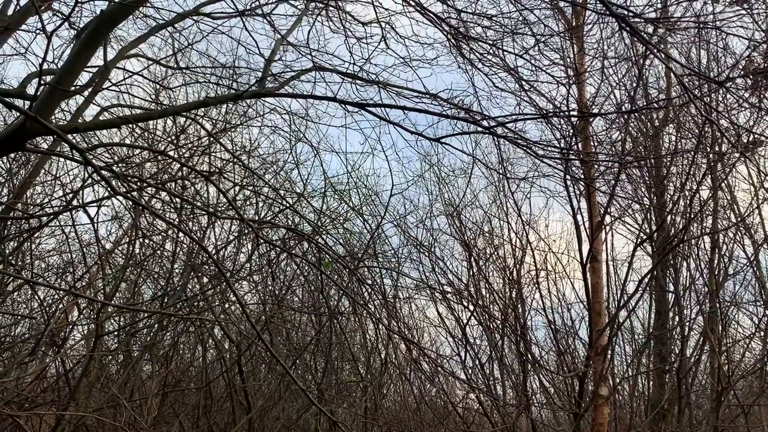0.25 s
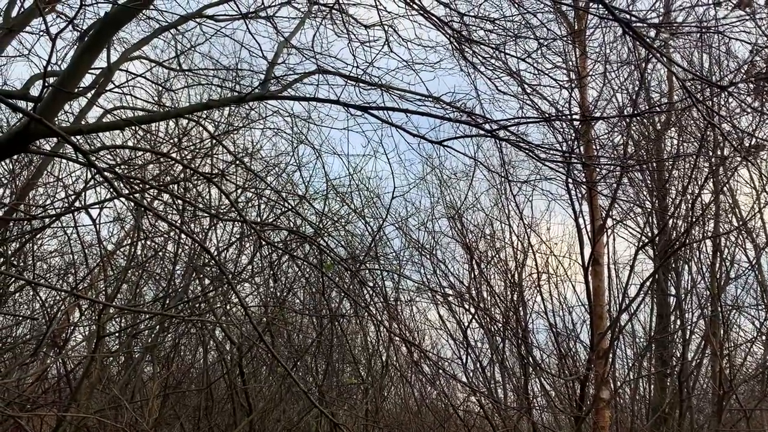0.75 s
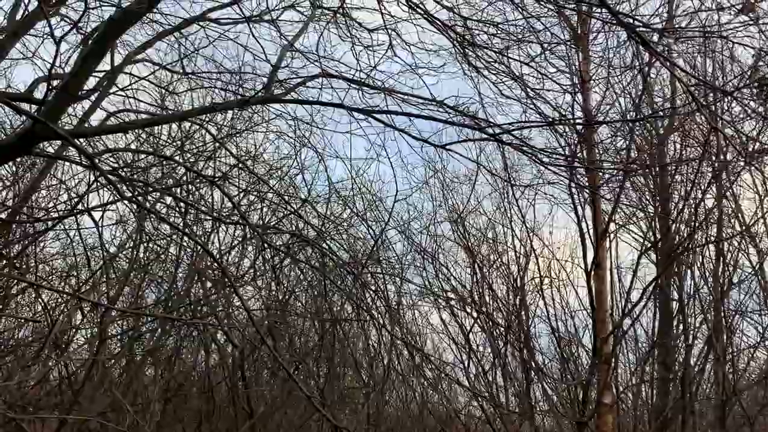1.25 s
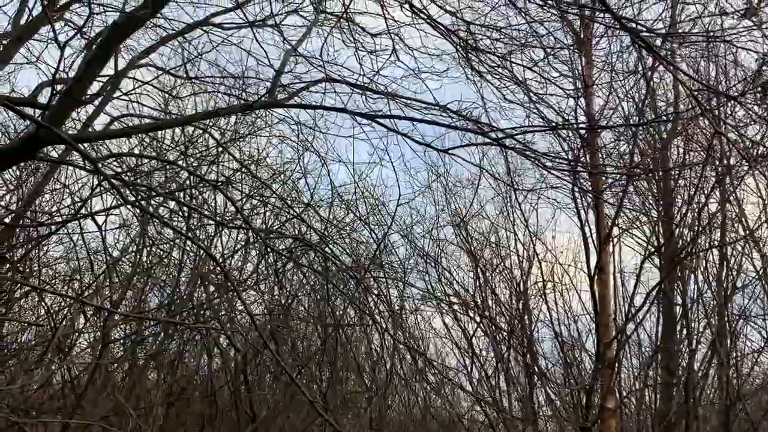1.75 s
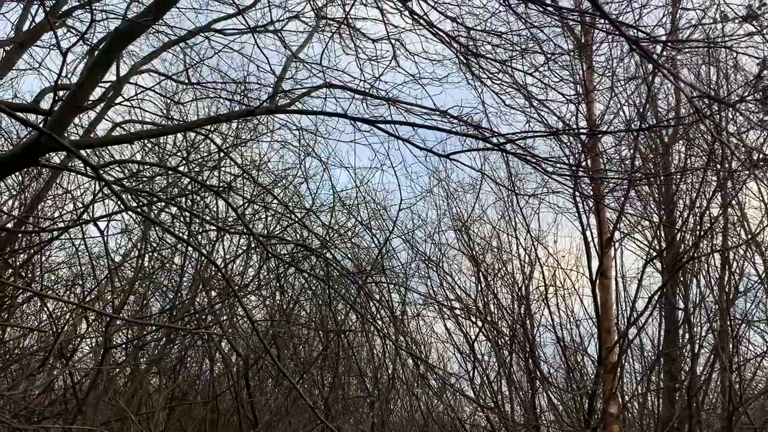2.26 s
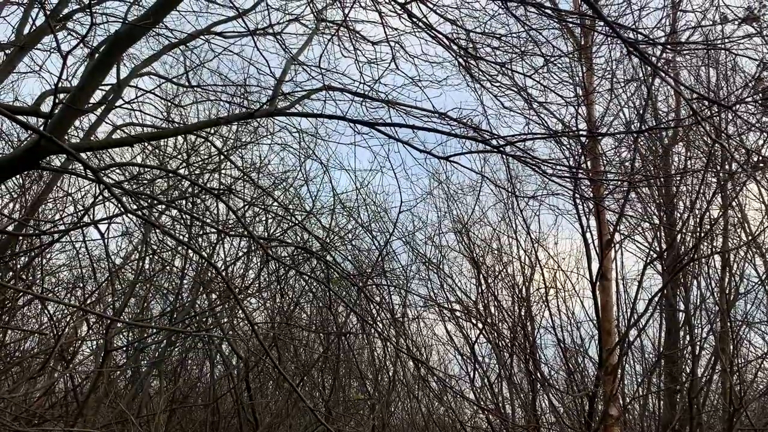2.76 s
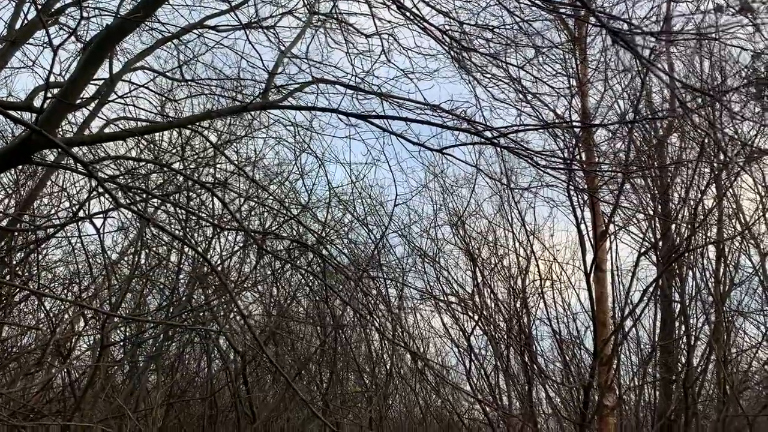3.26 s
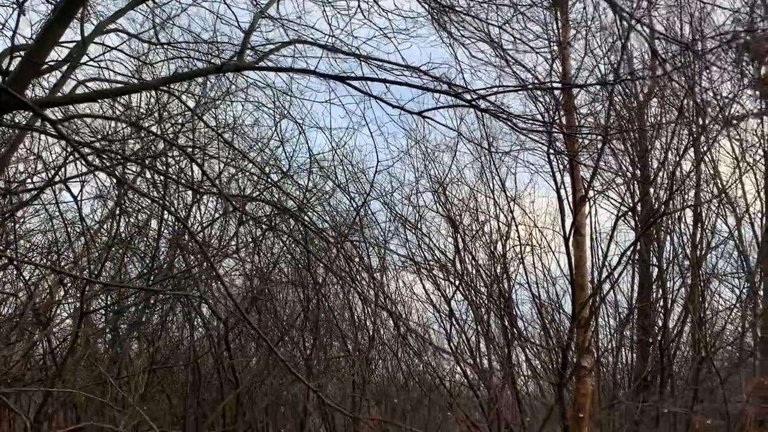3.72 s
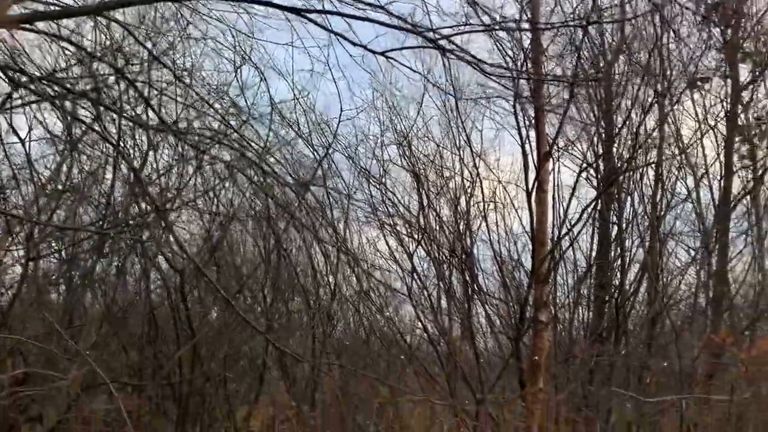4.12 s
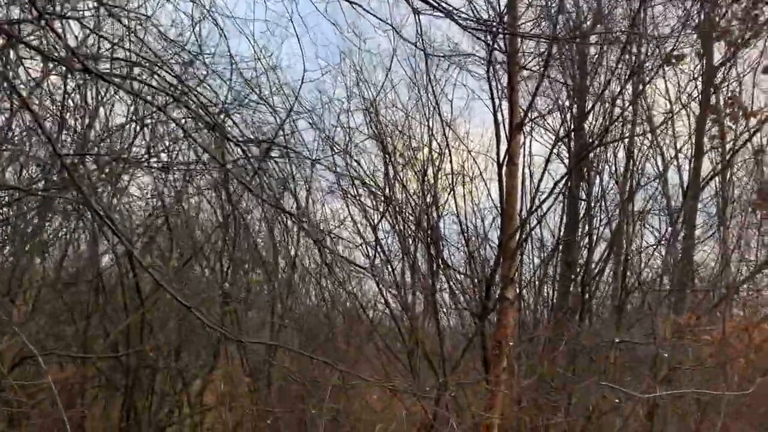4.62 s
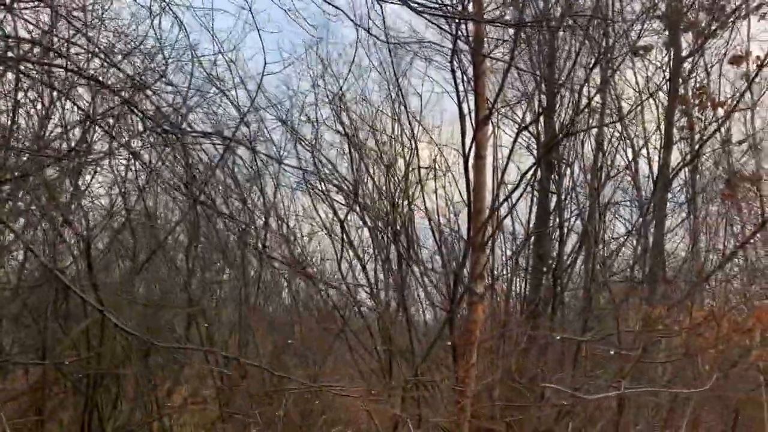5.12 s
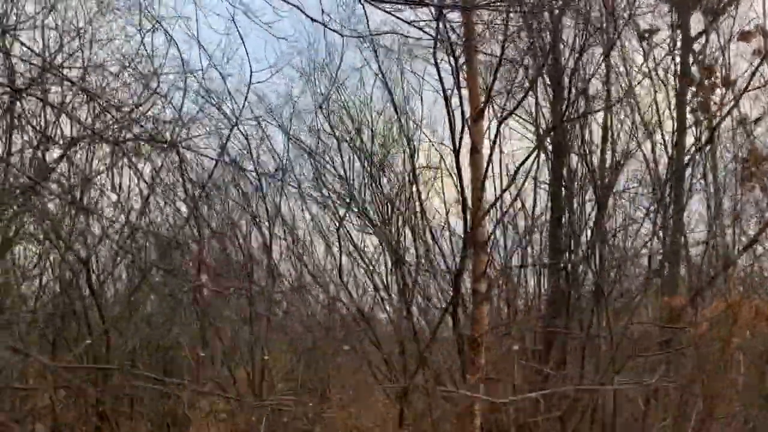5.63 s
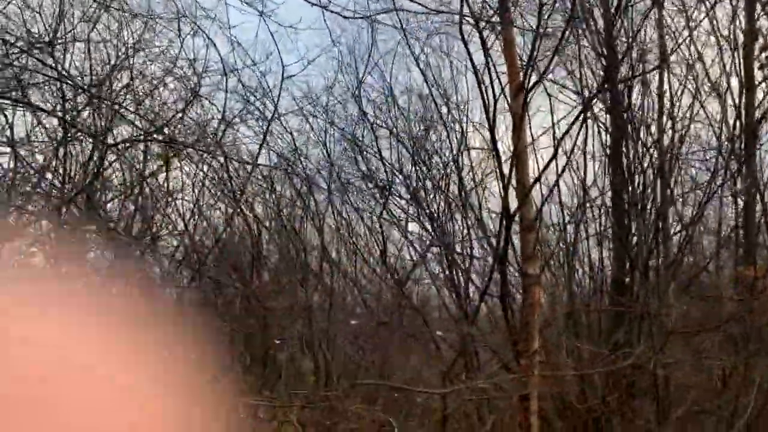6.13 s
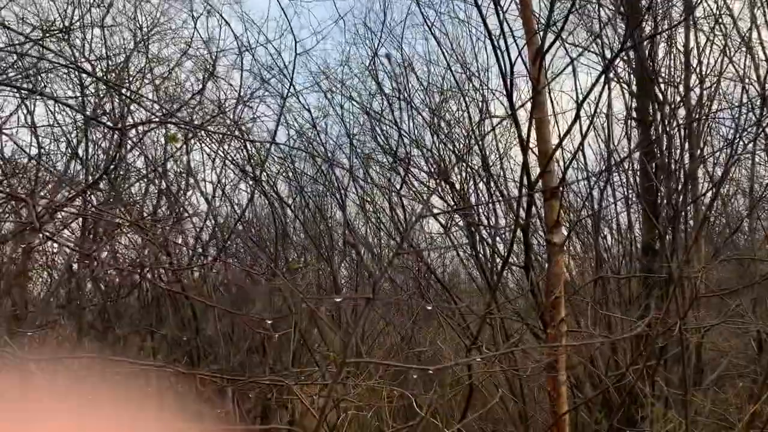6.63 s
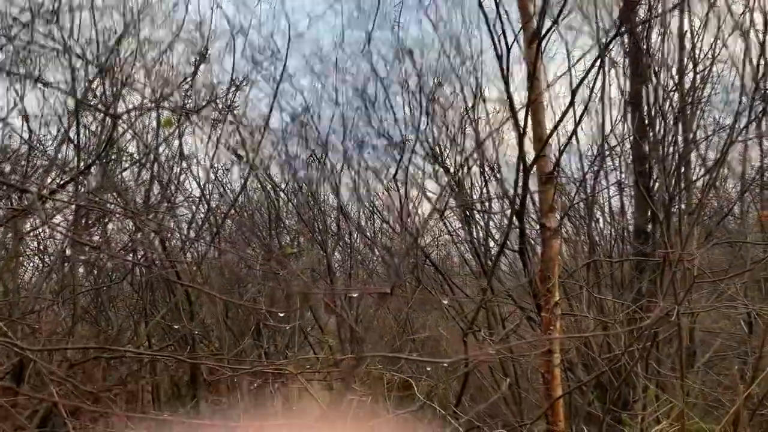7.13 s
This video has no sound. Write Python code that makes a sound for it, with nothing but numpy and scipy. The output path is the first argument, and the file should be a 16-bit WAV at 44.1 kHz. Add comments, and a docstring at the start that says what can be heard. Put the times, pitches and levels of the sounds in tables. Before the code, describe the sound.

A quiet bare woodland with low, soft air rumble, faint hiss and a distant road roar, strongest at the start and then duller. Dry leaves rustle in gentle puffs during the first two seconds. Extremely thin, high buzzing tit notes fall briefly at 0, 0.3, 2.4, 3.6, 3.9 and around 6.4 to 6.8 s. A nearby water rail on the right pips at 0.3 and 0.9 s, then squeals for about 0.3 s at 1.7 s, ending in a low break. Small finger taps occur at 2 to 3.4 s. At 4.0 s a loud, dull thump lands over a longer descending squeal. Knocks and rubs multiply from 4.8 s, with scratchy sliding at 5.5 s. A third squeal at 5.8 s ends roughly at 6.1 s. Hard clacks hit at 6.45 and, loudest, 6.97 s, amid faint creeping handling until the end.

```python
"""A distant road is loudest at first and fades; air rumbles softly and wind puffs stir dry leaves.
Thin tit notes come and go from the start, falling tones with a fast buzz. Nearby, a water rail gives
two short pips, then three strained squeals built from harmonics, two of them ending in a low break.
Fingers knock and rub on the recorder's case, more often from 4 s on: struck resonances and rough noise.
From 6 s the hand also creeps on the case with faint extra knocks."""
import sys
import numpy as np
from scipy import signal
from scipy.fft import rfft, irfft
from scipy.io import wavfile
from scipy.ndimage import uniform_filter1d

SR = 44100
rng = np.random.default_rng(int(sys.argv[2]) if len(sys.argv) > 2 else 0)


def put_to_file(sound):
    """Save the sound as 16-bit audio at rate SR, in the file named by the first command-line argument."""
    columns = np.atleast_2d(sound).T  # one column per channel
    safe = np.clip(columns, -1, 1)
    whole_steps = np.round(safe * 32767)
    wavfile.write(sys.argv[1], SR, whole_steps.astype(np.int16))


N = 325388
T = np.arange(N) / SR   # time of every sample, s
HZ = np.maximum(np.arange(N // 2 + 1) * SR / N, 1)   # frequency of every spectrum bin

# low rumble of air on the microphones over time: start_s, level_db
AIR_LEVEL = [(0, -51.5), (2.6, -49.5), (3.05, -54.5), (3.35, -51), (4.6, -54.5), (5.1, -52.5), (5.9, -56.5),
             (7.38, -54)]
# its spectrum, only the shape counts: frequency_hz, density_db
AIR_COLOUR = [(18, -33.5), (35, -14.5), (52, -1), (75, 0), (110, -7.5), (170, -19.5), (280, -23.5),
              (500, -42), (900, -45.5), (3000, -73)]
# spectrum of the steady hiss, only the shape counts: frequency_hz, density_db
HISS_COLOUR = [(200, 23.5), (600, 22), (1500, 9.5), (4000, -3), (7000, -8), (9500, 1), (12000, -14.5),
               (14500, -1), (16000, -23)]
HISS_DB = -67.5

# distant road over time, before its slow waver: start_s, level_db
ROAD_LEVEL = [(0, -45.5), (.48, -55.5), (.95, -48.5), (1.6, -51), (2, -51), (2.8, -55), (3.9, -56),
              (4.8, -53), (6.4, -55), (7.38, -54)]
# its spectrum, only the shape counts: frequency_hz, density_db
ROAD_COLOUR = [(200, -12), (450, -19), (750, -9), (950, -2.5), (1200, 0.5), (1500, -6.5), (2000, -12),
               (2800, -20), (3600, -27), (5000, -48.5), (7000, -72), (15000, -77)]
# how far the left side leads for road and leaves (negative: it lags): frequency_hz, phase_radians
ROAD_PHASE = [(30, -6.5), (250, -8), (600, -3.5), (1300, -2.5), (2200, -3.5), (4050, -9), (8700, -15)]
# how alike the road is on both sides: frequency_hz, likeness_0_to_1
ROAD_LIKENESS = [(200, 0.2), (700, 0.84), (1300, 0.86), (2500, 0.21), (5000, 0.02)]
# extra treble, sinking as the traffic moves off, but never below the floor
ROAD_BRIGHT_DB, ROAD_DULLING_DB_PER_S, ROAD_DULLEST_DB = 2.5, 0.57, -10.5

# wind puffs in dry leaves: strongest_s, half_length_s, level_db, crispness_db
PUFFS = [(0.186, 0.26, -52, -1.5), (0.81, 0.28, -52, -4), (1.26, 0.18, -56.5, 9.5), (2.038, 0.51, -62.5, 8)]
# spectrum of the rustle, only the shape counts: frequency_hz, density_db
LEAF_COLOUR = [(700, -31), (1300, 5.5), (1750, 12.5), (2400, 3), (3300, -11.5), (4500, -13.5), (5800, -29),
               (7500, -44), (15000, -71)]
LEAVES_CALM_DB = -80.5   # rustle between the puffs
CRISP_HZ = 4180   # crispness lifts the rustle above this

# tit notes, levels before the distance: start_s, length_s, start_hz, level_db
TIT_NOTES = [(0.0, 0.12, 7200, -71), (0.331, 0.039, 8370, -61.5), (2.39, 0.056, 8400, -66),
             (3.37, 0.037, 7750, -78), (3.64, 0.052, 8370, -67.5), (3.888, 0.049, 8600, -61.5),
             (6.363, 0.046, 8200, -63.5), (6.529, 0.052, 8600, -62), (6.78, .04, 7400, -77)]
TIT_END_HZ = 6860   # the pitch each note falls towards

# slow jolts of the whole recorder: start_s, peak_db, pitch_hz
BUMPS = [(0.157, -42, 74), (2.565, -36, 71), (3.818, -32.5, 57), (4.023, -33.5, 73), (5.693, -39.5, 84),
         (6.453, -27, 86.5)]
# finger slides: strongest_s, half_length_s, level_db
RUBS = [(5.352, 0.081, -49.5), (5.488, 0.12, -39.5), (5.707, 0.096, -48), (5.837, 0.17, -50),
        (6.049, 0.034, -40.5), (6.337, .06, -56), (6.438, 0.048, -35.5), (6.69, .06, -52.5),
        (7.209, 0.11, -50.5)]
# spectrum of skin on the case, only the shape counts: frequency_hz, density_db
SKIN_COLOUR = [(40, -19), (110, -1.5), (300, -5.5), (550, -12.5), (850, 2.5), (1100, -4.5), (1450, -20.5),
               (2500, -28.5), (4500, -36.5), (9000, -50.5), (15000, -41.5)]
# finger knocks: start_s, shell_db, thump_db, hardness_0_to_1 (0 fingertip, 1 nail)
KNOCKS = [(1.46, -56, -42, 0), (2.061, -44, -41.5, 0.18), (2.561, -47, -46, 0.16),
          (3.420, -42.5, -47, 0.74), (4.0192, -7, -21, 0.008), (4.1361, -34, -41, 0.02),
          (4.184, -23.5, -32.5, 0), (4.202, -33, -38, 0), (4.243, -26, -35.5, 0.03), (4.755, -54, -45, 0),
          (4.831, -40, -38, 0), (5.070, -33.5, -48, 0.017), (5.156, -36, -51, 0.11),
          (5.479, -29.5, -55, 0.69), (5.529, -34, -47, 0.73), (5.677, -33.5, -37.5, 0.93),
          (5.695, -28.5, -31.5, 0.92), (5.806, -45, -47, 0.83), (6.034, -31.5, -40, 0.71),
          (6.102, -46, -41.5, 0), (6.210, -47, -54, 0.044), (6.294, -35, -36.5, 0.0097),
          (6.323, -46, -40.5, 0.025), (6.391, -39.5, -43, .3), (6.451, -17.5, -33.5, 1),
          (6.4549, -22, -22.5, 0.52), (6.9737, -7.5, -14, 0.93), (7.013, -36, -58, 0.54),
          (7.0886, -30, -45, 0.35), (7.239, -34, -38.5, 0.42)]
# spectrum of the tick of a touch, before its own level: frequency_hz, gain_db
TICK_COLOUR = [(500, -12), (1500, 5), (2200, 17.5), (3000, 9), (4500, -1.5), (6300, -0.5), (8000, -7),
               (11000, 1.5), (15000, -1), (18000, -32)]
# how far the left side leads for the case: frequency_hz, phase_radians
CASE_PHASE = [(20, 2), (110, 0.5), (350, 0.88), (800, -1.5), (1300, -1.5), (2900, -4.5), (5400, -4),
              (16000, -11.5)]
# how much louder the left side is for the case: frequency_hz, balance_db
CASE_BALANCE = [(300, 0), (800, 0.5), (1300, 3), (2400, 11.5), (6000, 0.5), (9000, 3)]
SOFT_HZ, HARD_HZ = 722, 916   # a harder touch rings the shell higher
SOFT_TICK_DB, HARD_TICK_DB = -52, -10.5   # and ticks louder, relative to the shell
SHELL_WIDTH_HZ = 206
SHELL_TOP = 1.22   # the shell stops sounding this many times above its pitch
THUMP_HZ, THUMP_WIDTH_HZ, FLEX_HZ, FLEX_WIDTH_HZ = 146, 440, 143, 74
BENDING_HZ = 804   # pitch at which the delay of bending waves is stated
SCUFF_DB, SCUFF_S = -30.5, 0.014   # drag after a knock: level relative to the shell, decay time
GRIP_FROM_S, GRIP_TO_S, GRIP_DB, GRIP_WAVER_DB = 6, 7.35, -61, 2   # the hand creeping on the case
CREAK_DB, CREAK_SPREAD_DB, CREAK_HARDNESS = -51.5, 2, .2   # faint random knocks meanwhile

# one list per squeal, levels before the throat's colour: start_s, pitch_hz, level_db
SQUEALS = [
    [(1.69, 3190, -56), (1.703, 3324, -44), (1.727, 3106, -53), (1.755, 2822, -51.5), (1.825, 2860, -45.5),
     (1.862, 2910, -52), (1.9, 2943, -45.5), (1.94, 3000, -60), (1.975, 2937, -48.5)],
    [(3.974, 3050, -56), (3.986, 3340, -45.5), (4.04, 2785, -53.5), (4.075, 2620, -46), (4.115, 2800, -49),
     (4.137, 2470, -47), (4.17, 2545, -53), (4.205, 2675, -54), (4.225, 2284, -45.5), (4.26, 2290, -49.5),
     (4.295, 2480, -49), (4.32, 2253, -48), (4.366, 2135, -46.5)],
    [(5.832, 2840, -46.5), (5.847, 3065, -41), (5.875, 3113, -48.5), (5.905, 2962, -43.5),
     (5.965, 2945, -45), (6.007, 2777, -44.5), (6.06, 2884, -45), (6.082, 3090, -45.5), (6.098, 3290, -54)],
]
# one row per squeal: octave_db, overtones_db, pitch_jitter_share
SQUEAL_COLOUR = [(0, -14.5, 0.0078), (1, -19, .012), (-2, -19.5, 0.0085)]
# throat's effect on a squeal's two lowest harmonics: frequency_hz, gain_db
SQUEAL_THROAT = [(2200, -9), (2550, -2.5), (2950, -1.7), (3300, 0), (4500, -3.5), (5200, -9.5), (5900, -8),
                 (6600, -9.5)]
# colour of a squeal's higher harmonics: frequency_hz, gain_db
OVERTONES = [(6500, 12.5), (8800, -9.5), (10200, 6.5), (11500, -17), (13200, 3), (14800, -9.5),
             (16000, -13)]
# echoes interfere, so the two lowest harmonics waver at random in opposite directions
WAVER_DB, WAVERS_PER_S = 4.5, 32.4
STRAIN_HZ, SLACK_DB_PER_OCTAVE = 2750, 61   # overtones are full above this pitch and fade below it
# pips, levels before the throat's colour: start_s, length_s, top_pitch_hz, level_db
PIPS = [(.294, .042, 2495, -47.5), (.926, .035, 2514, -44.5)]
PIP_ARCH_HZ, PIP_SWELL_DB, PIP_ROUGH = 326, 5, 0.02   # pitch and level arch over a pip
PIP_PEAK_AT = .62   # share of a pip's length at which it is loudest
# low ends of two squeals, before the throat: start_s, length_s, start_hz, level_db, roughness_0_to_1
BREAKS = [(1.97, .04, 1567, -52.5, .1), (6.094, .072, 1696, -50, 0.75)]
BREAK_FALL_HZ, BREAK_FADE_DB, BREAK_BEND = 259, 4.5, 1.2   # they sink and fade, faster near the end
# the throat in pips and breaks: frequency_hz, gain_db
THROAT = [(1450, -25), (1700, -8), (2400, -7), (3100, -2), (3700, -15), (4300, 2), (5100, -4), (5700, -10),
          (6500, -11.5), (7500, -27.5), (10000, -34), (12500, -51), (15500, -43)]
# how far the left side leads for the rail (negative: it lags): frequency_hz, phase_radians
RAIL_PHASE = [(1000, 2), (2500, -2.5), (3000, -3.5), (4500, -4.5), (5200, -6.5), (5900, -8.5),
              (9000, -13.5), (16000, -24.5)]
# how much louder the left side is for the rail: frequency_hz, balance_db
RAIL_BALANCE = [(2000, 3.5), (3000, -7.5), (4700, -2), (6000, -7), (9000, 0.5), (14000, 0.5)]

WOOD_T60_S = 0.38   # time for the far echoes' decay curve to drop 60 dB
CUTOFF_HZ = 15900


def from_db(db):
    """Turn decibels into gain."""
    return 10 ** (np.asarray(db) / 20)


def rms_one(x):
    """Scale to unit power."""
    return x / np.sqrt(np.mean(x ** 2) + 1e-20)


def at_hz(points, hz):
    """Read a curve along a logarithmic frequency axis."""
    f, value = np.transpose(points)
    return np.interp(np.log(hz), np.log(f), value)


def in_time(rows, t=T):
    """Read every column of a curve at times t."""
    s, *columns = np.transpose(rows)
    return [np.interp(t, s, c) for c in columns]


def drift(rate, size=N):
    """Wander at random with a spread of about 1, through `rate` new values per second."""
    knots = rng.standard_normal(int(size / SR * rate) + 3)
    position = np.arange(size) / SR * rate
    return np.interp(position, np.arange(len(knots)), knots) * np.sqrt(3 / 2)


def noise(colour):
    """Make noise of unit power with a given spectrum."""
    white = rfft(rng.standard_normal(N))
    return rms_one(irfft(white * from_db(at_hz(colour, HZ)), N))


def noise_pair(colour):
    """Make independent noise for the left and right sides."""
    return np.array([noise(colour), noise(colour)])


def place(x, phase, pan_db):
    """Give one sound to both microphones, shifted in phase and level (positive pan: louder left)."""
    spectrum = rfft(x)
    left = spectrum * np.exp(1j * at_hz(phase, HZ)) * from_db(pan_db / 2)
    right = spectrum * from_db(-pan_db / 2)
    return irfft([left, right], N)


def resonate(x, hz, width_hz):
    """Ring at one pitch with a peak gain of 1; a narrower width rings longer."""
    r = np.exp(-np.pi * width_hz / SR)
    feed = np.array([1, 0, -1]) * (1 - r * r) / 2
    return signal.lfilter(feed, [1, -2 * r * np.cos(2 * np.pi * hz / SR), r * r], x)


def cut(x, hz, kind, order):
    """Apply a Butterworth filter."""
    return signal.sosfilt(signal.butter(order, hz, kind, fs=SR, output="sos"), x)


def add(out, sound, s):
    """Mix a sound in from time s."""
    i = max(round(s * SR), 0)
    out[i:i + len(sound)] += sound[:N - i]


def thicket(x, near_db, far_db, near_t60):
    """Nearby twigs scatter a quick spray of echoes; distant trunks add a longer, duller tail."""
    t = np.arange(SR) / SR
    white = rng.standard_normal((2, 2, SR))
    near = white[0] * from_db(-60 * t / near_t60) * (t > .002)
    build_up = 1 - np.exp(-t / 0.029)
    far = cut(white[1], 9400, "low", order=2) * from_db(-60 * t / WOOD_T60_S) * build_up
    echoes = (from_db(near_db) * rms_one(near) + from_db(far_db) * rms_one(far)) / np.sqrt(SR)
    return signal.fftconvolve(x[None], echoes, axes=1)[:, :N]


def air(lump_db, own_db):
    """Air makes a lumpy low rumble, nearly alike on both sides, over a faint even hiss."""
    level_db, = in_time(AIR_LEVEL)
    rumble = noise(AIR_COLOUR) + from_db(own_db) * noise_pair(AIR_COLOUR)
    hiss = from_db(HISS_DB) * noise_pair(HISS_COLOUR)
    return rumble * from_db(level_db + lump_db * drift(18)) + hiss


def road(pan_db, waver_db):
    """Far tyres roar as noise from the right, part shared and part scattered, with sinking treble."""
    level_db, = in_time(ROAD_LEVEL)
    bright_db = np.maximum(ROAD_BRIGHT_DB - ROAD_DULLING_DB_PER_S * T, ROAD_DULLEST_DB)
    alike = np.clip(at_hz(ROAD_LIKENESS, HZ), 0, 1)
    direct = rfft(place(noise(ROAD_COLOUR), ROAD_PHASE, pan_db))
    scattered = rfft(noise_pair(ROAD_COLOUR))
    roar = direct * np.sqrt(alike) + scattered * np.sqrt(1 - alike)
    treble = irfft(roar / (1 + (1800 / HZ) ** 4), N)
    brightened = irfft(roar, N) + (from_db(bright_db) - 1) * treble
    return brightened * from_db(level_db + waver_db * drift(18))


def leaves(flicker_db):
    """Dry leaves rub in the wind: flickering noise that swells with each puff."""
    stir, crisp = from_db(LEAVES_CALM_DB), 0
    for s, half, db, crisp_db in PUFFS:
        swell = from_db(db) * np.exp(-((T - s) / half) ** 2)
        stir = stir + swell
        crisp = crisp + swell * (from_db(crisp_db) - 1)
    shared = place(noise(LEAF_COLOUR), ROAD_PHASE, pan_db=-6.5)
    rustle = shared + from_db(-2.0) * noise_pair(LEAF_COLOUR)
    treble = irfft(rfft(rustle) / (1 + (CRISP_HZ / HZ) ** 6), N)
    return (rustle * stir + treble * crisp) * from_db(flicker_db * drift(60))


def tit(trill_hz, depth_share):
    """The tit sings thin falling tones whose pitch buzzes by a share of each note's fall."""
    out = np.zeros(N)
    for s, length, start_hz, level_db in TIT_NOTES:
        u = np.linspace(0, 1, int(length * SR))   # progress through the note
        fall_hz = start_hz - TIT_END_HZ
        buzz = depth_share * fall_hz * np.sin(2 * np.pi * trill_hz * length * u)
        pitch = start_hz - fall_hz * u ** 0.97 + buzz + 90 * drift(614, len(u))
        envelope = np.sqrt(2 * np.abs(np.sin(np.pi * u)))
        add(out, from_db(level_db) * envelope * np.sin(2 * np.pi * np.cumsum(pitch) / SR), s)
    return out


def bumps(width_hz):
    """The whole recorder jolts in the hand for a few slow cycles, as a damped low resonance."""
    out = np.zeros(N)
    for s, peak_db, hz in BUMPS:
        push = resonate(signal.unit_impulse(SR // 5), hz, width_hz)
        jolt = cut(resonate(push, hz, width_hz), 102, "low", order=3)
        add(out, from_db(peak_db) * jolt / np.abs(jolt).max(), s)
    return out


def rubs(slip_db):
    """Skin sticks and slips as uneven noise: in slides, after knocks and under the creeping grip."""
    slides = sum(from_db(db) * np.maximum(1 - np.abs(T - s) / half, 0) ** 2.35 for s, half, db in RUBS)
    scuffs = sum(from_db(shell_db + SCUFF_DB) * (T > s) * np.exp(-np.abs(T - s) / SCUFF_S)
                 for s, shell_db, *_ in KNOCKS)
    gripping = (T > GRIP_FROM_S) * (T < GRIP_TO_S)
    grip = gripping * from_db(GRIP_DB + GRIP_WAVER_DB * drift(15))
    skin = rms_one(noise(SKIN_COLOUR) * from_db(slip_db * drift(280)))
    return (slides + scuffs + grip) * skin


def creaks(count=8):
    """List faint knocks at random times while the grip creeps, as rows like those of KNOCKS."""
    times = rng.uniform(GRIP_FROM_S, min(GRIP_TO_S, T[-1]), count)
    levels = CREAK_DB + CREAK_SPREAD_DB * rng.standard_normal((count, 2))
    return [(s, *db, CREAK_HARDNESS) for s, db in zip(times, levels)]


def knocks(spread_s, tick_s, tick_db):
    """A touch gives a gritty tick, a short ring of the shell and a thump that sags into a slow flex."""
    click = signal.unit_impulse(SR // 10)
    t = np.arange(len(click)) / SR
    hz = np.maximum(np.fft.rfftfreq(len(click), 1 / SR), 1)
    # low bending waves travel slower, so every knock sweeps downwards;
    # spread_s is the full delay at BENDING_HZ, and each part below takes its own multiple
    bending = -4j * np.pi * spread_s * np.sqrt(BENDING_HZ * hz)
    flex = resonate(resonate(click, FLEX_HZ, FLEX_WIDTH_HZ), FLEX_HZ, 216)
    thump = resonate(click, THUMP_HZ, THUMP_WIDTH_HZ) + from_db(3.0) * flex
    thump = irfft(rfft(cut(thump, 767, "low", order=4)) * np.exp(bending * 1.696))
    thump /= np.abs(thump).max()
    # follows the tick's level, so it is strongest in hard touches
    upper_mode = from_db(-3.5) * np.sin(2 * np.pi * 2150 * t) * np.exp(-t / 0.00063)
    out = np.zeros(N)
    for s, shell_db, thump_db, hardness in [*KNOCKS, *creaks()]:
        shell_hz = SOFT_HZ + hardness * (HARD_HZ - SOFT_HZ)
        hard_db = shell_db + SOFT_TICK_DB + hardness * (HARD_TICK_DB - SOFT_TICK_DB)
        # a crack, then a faint scuff
        fade = np.exp(-t / tick_s) + from_db(-33) * np.exp(-t / 0.031)
        grit = rng.standard_normal(len(click)) * fade
        tick = irfft(rfft(grit) * from_db(at_hz(TICK_COLOUR, hz)) * np.exp(bending / 2))
        tick *= from_db(tick_db) / np.abs(grit).max()
        shell = cut(resonate(click, shell_hz, SHELL_WIDTH_HZ), shell_hz * SHELL_TOP, "low", order=6)
        shell = irfft(rfft(cut(shell, 360, "high", order=2)) * np.exp(bending / 2))
        shell /= np.abs(shell).max()
        knock = from_db(shell_db) * shell + from_db(thump_db) * thump
        add(out, knock + from_db(hard_db) * (tick + upper_mode), s)
    return out


def syrinx(rows, jitter, flutter_db, edge_s):
    """The bird's voice box sounds one note: returns pitch, phase, fluttering envelope and levels."""
    start, end = rows[0][0], rows[-1][0]
    t = np.arange(start - edge_s / 2, end + edge_s / 2, 1 / SR)
    pitch, *levels = in_time(rows, t)
    pitch = uniform_filter1d(pitch, size=300) * (1 + jitter * drift(504.6, len(t)))
    edges = np.clip(np.minimum(t - t[0], t[-1] - t) / edge_s, 0, 1)
    gate = np.sin(np.pi / 2 * edges) ** 2
    envelope = np.sqrt(2) * gate * from_db(flutter_db * drift(224.3, len(t)))
    return pitch, 2 * np.pi * np.cumsum(pitch) / SR, envelope, levels


def short_shapes(count=9):
    """Shape arching pips and sinking breaks as curves of time, pitch and level, with roughness."""
    u = np.linspace(0, 1, count)   # progress through the note
    arch, swell, sink = (2 * u - 1) ** 2, (2 * (u - PIP_PEAK_AT)) ** 2, u ** BREAK_BEND
    shapes = []
    for s, length, hz, db in PIPS:
        curve = np.c_[s + length * u, hz - PIP_ARCH_HZ * arch, db - PIP_SWELL_DB * swell]
        shapes.append((curve, PIP_ROUGH))
    for s, length, hz, db, rough in BREAKS:
        curve = np.c_[s + length * u, hz - BREAK_FALL_HZ * sink, db - BREAK_FADE_DB * sink]
        shapes.append((curve, rough))
    return shapes


def short_notes(second_voice, rasp):
    """The throat favours harmonics near its resonances; the other side of the syrinx roughens them."""
    out = np.zeros(N)
    for rows, rough in short_shapes():
        pitch, phase, envelope, (note_db,) = syrinx(rows, jitter=.003, flutter_db=1.3, edge_s=0.0053)
        voice = sum(from_db(at_hz(THROAT, k * pitch)) * np.sin(k * phase) for k in range(1, 8))
        # a beat at 3/8 of the pitch splits each harmonic into strands
        strands = second_voice * np.sin(phase * 3 / 8)
        voice *= 1 + rough * (strands + rasp * drift(2900, len(phase)))
        add(out, voice * envelope * from_db(note_db), rows[0][0] - .003)
    return out


def squeals(rasp_db):
    """Strained notes: two low harmonics waver oppositely, overtones break up, a little rasp on top."""
    out = np.zeros(N)
    for rows, (own_octave_db, overtone_db, jitter) in zip(SQUEALS, SQUEAL_COLOUR):
        pitch, phase, envelope, (level_db,) = syrinx(rows, jitter=jitter, flutter_db=1.0, edge_s=.005)
        size = len(phase)
        waver_db = WAVER_DB * drift(WAVERS_PER_S, size)
        first_db = level_db + at_hz(SQUEAL_THROAT, pitch) + waver_db / 2
        octave_db = level_db + at_hz(SQUEAL_THROAT, 2 * pitch) + own_octave_db - waver_db
        slack_db = SLACK_DB_PER_OCTAVE * np.minimum(np.log2(pitch / STRAIN_HZ), 0)
        upper_db = level_db + overtone_db + slack_db
        voice = from_db(first_db) * np.sin(phase) + from_db(octave_db) * np.sin(2 * phase)
        for k in range(3, 7):
            breakup_db = 3.2 * drift(45, size) + 3 * drift(700, size) - 1.5
            harmonic_db = upper_db + breakup_db + at_hz(OVERTONES, k * pitch)
            voice += from_db(harmonic_db) * np.sin(k * phase)
        # the rasp pulses once per cycle of the voice
        rasp = cut(rng.standard_normal(size), 4500, "high", order=4) * (1 + np.sin(phase))
        add(out, (voice + from_db(octave_db + rasp_db) * rasp) * envelope, rows[0][0] - .003)
    return out


def birds(tit_db):
    """The tit is heard mostly through the trees; the rail is close by on the right."""
    far_bird = tit(trill_hz=123.7, depth_share=0.5)
    far = from_db(tit_db) * far_bird + thicket(far_bird, near_db=-4, far_db=-34, near_t60=0.31)
    rail = short_notes(second_voice=0.97, rasp=0.47) + squeals(rasp_db=-51)
    near = place(rail, RAIL_PHASE, at_hz(RAIL_BALANCE, HZ))
    return far + near + thicket(rail, near_db=-8.5, far_db=-19, near_t60=.26)


def scene():
    """Add up the background, the hand on the case and the birds."""
    background = air(lump_db=1.6, own_db=-17) + road(pan_db=-3.5, waver_db=.5) + leaves(flicker_db=2.0)
    touches = bumps(width_hz=52) + rubs(slip_db=3.0)
    touches += knocks(spread_s=0.001305, tick_s=0.00068, tick_db=-2.0)
    hand = place(touches, CASE_PHASE, at_hz(CASE_BALANCE, HZ))
    return background + hand + birds(tit_db=-22)


def record(dry):
    """Cut the top steeply with an elliptic low-pass filter."""
    return signal.sosfilt(signal.ellip(10, .3, 70, CUTOFF_HZ, fs=SR, output="sos"), dry)


dry = scene()
out = record(dry)
put_to_file(out)
```